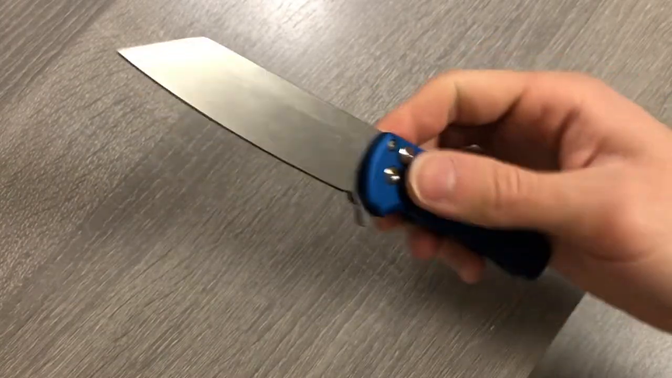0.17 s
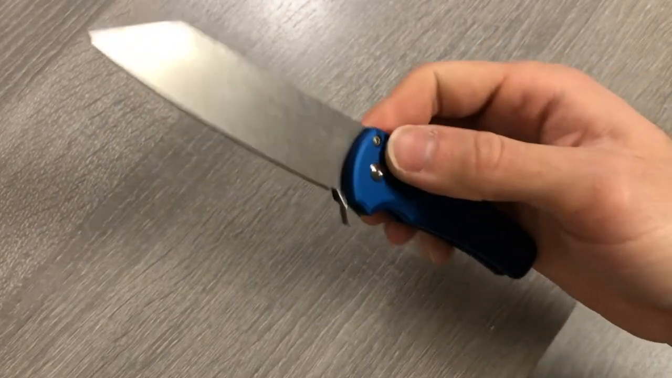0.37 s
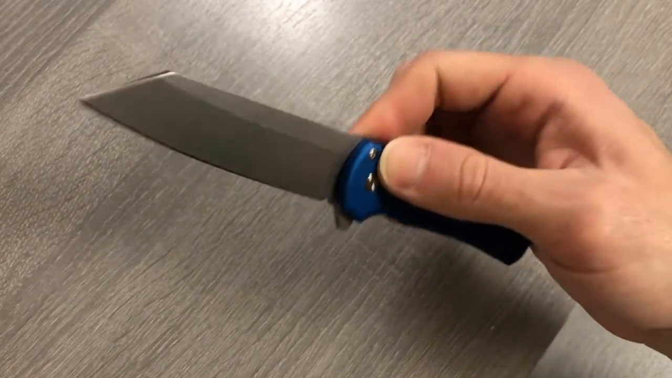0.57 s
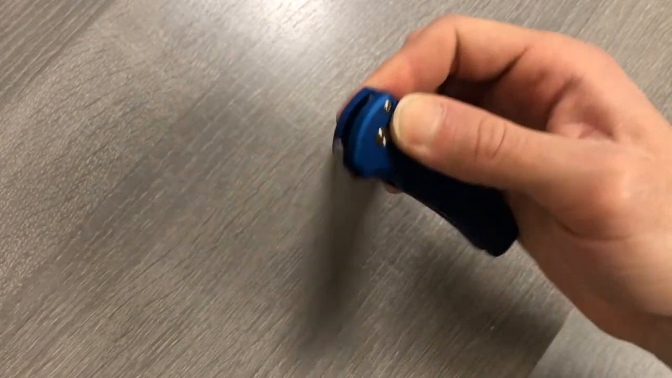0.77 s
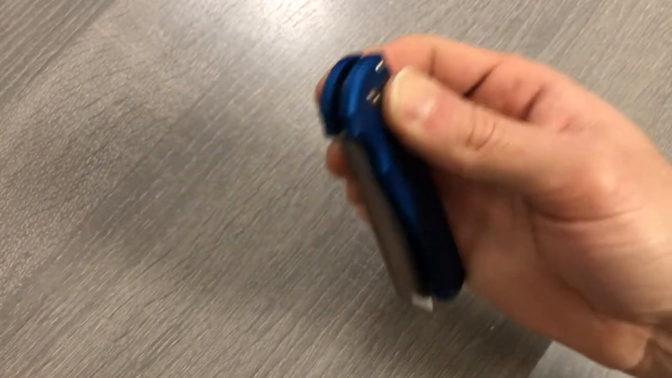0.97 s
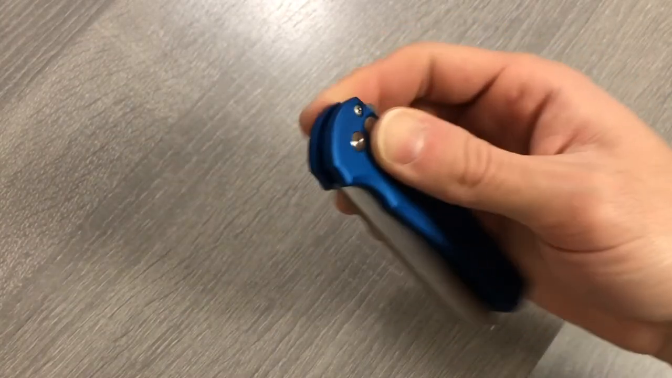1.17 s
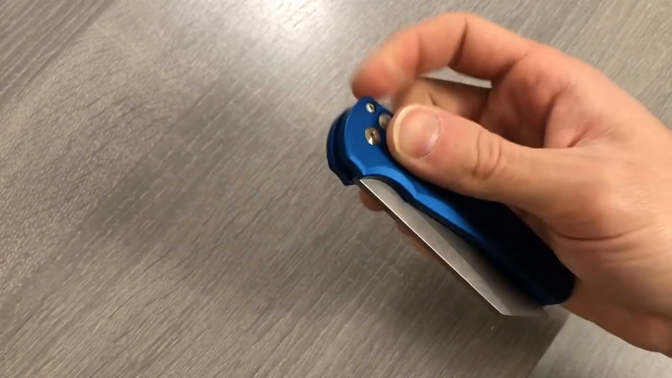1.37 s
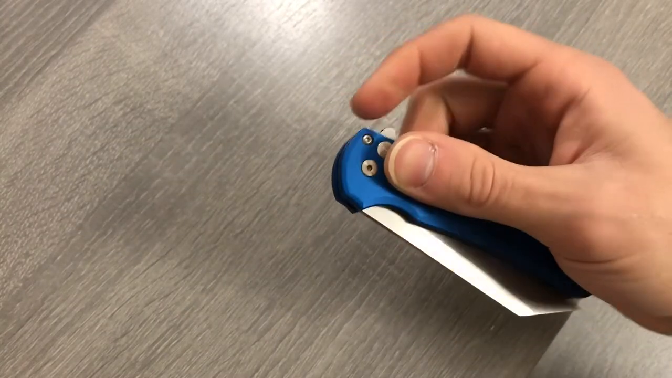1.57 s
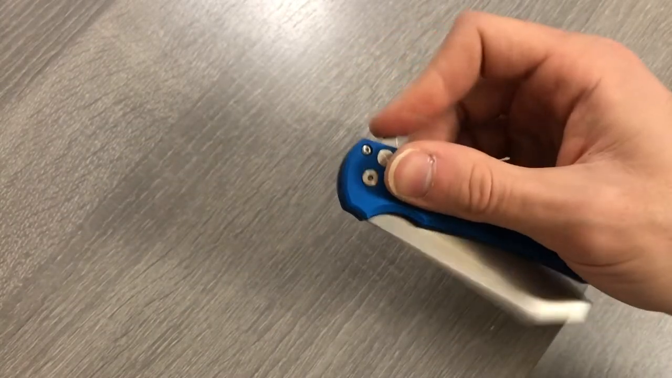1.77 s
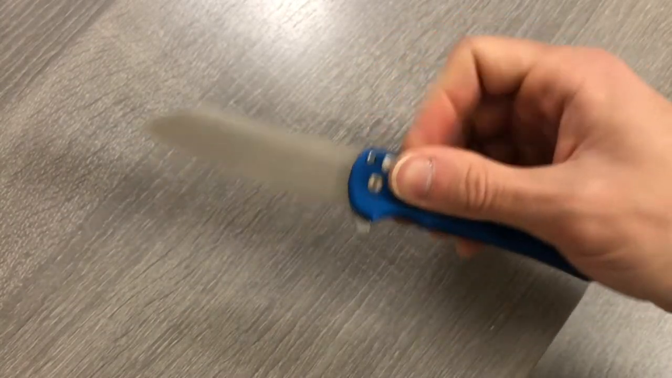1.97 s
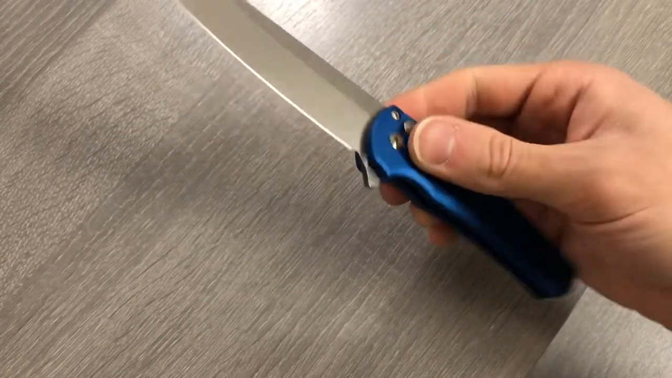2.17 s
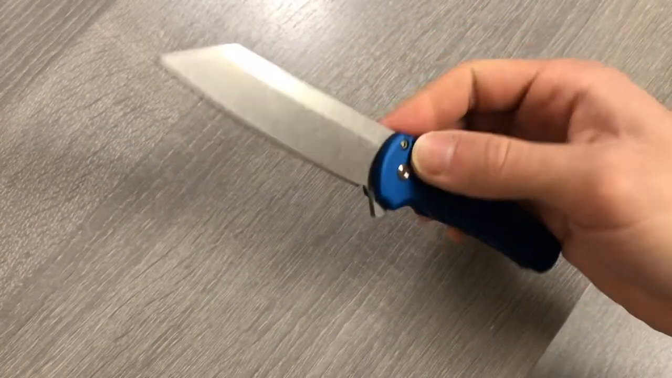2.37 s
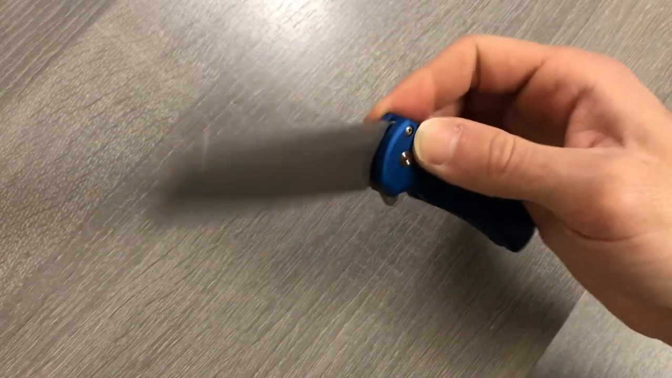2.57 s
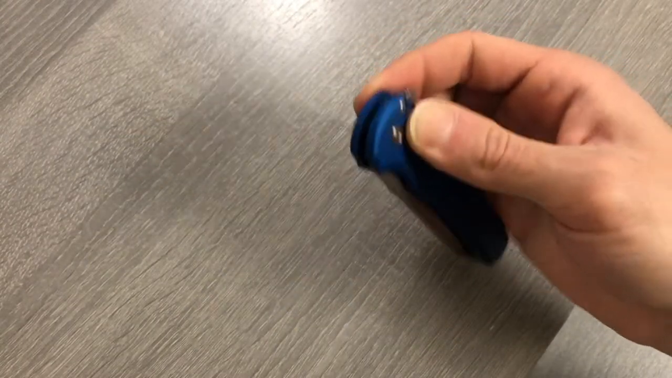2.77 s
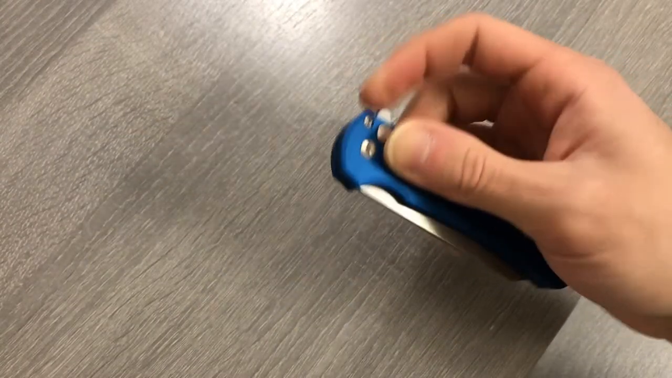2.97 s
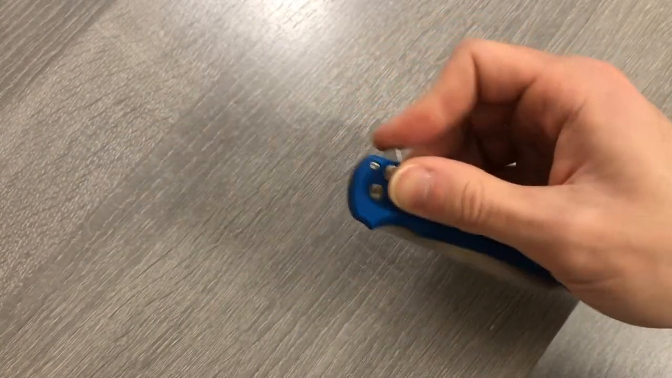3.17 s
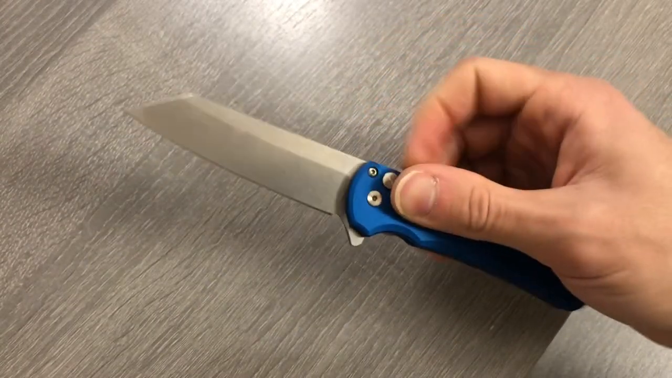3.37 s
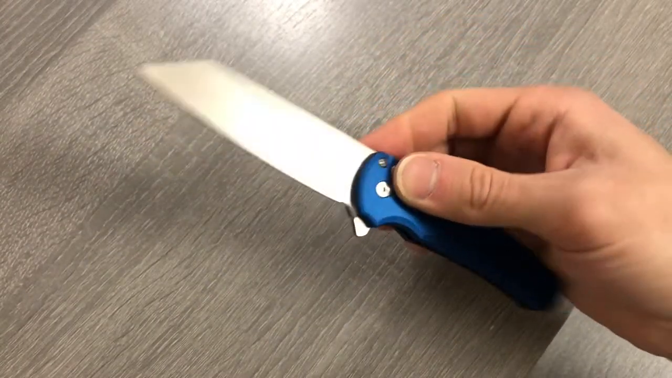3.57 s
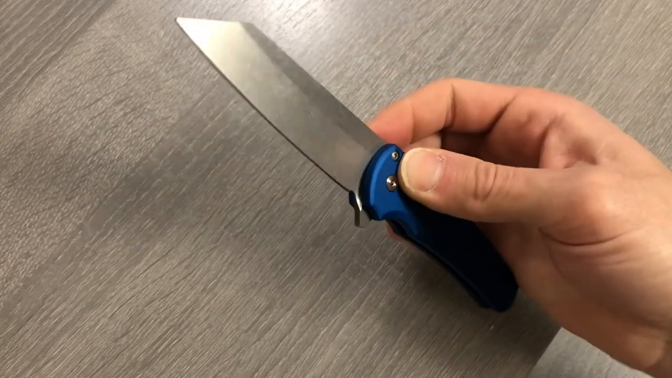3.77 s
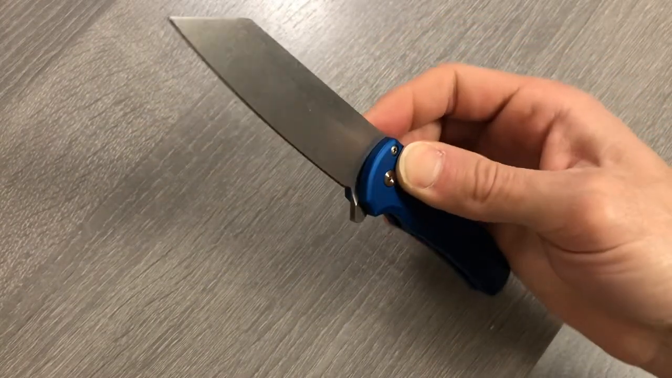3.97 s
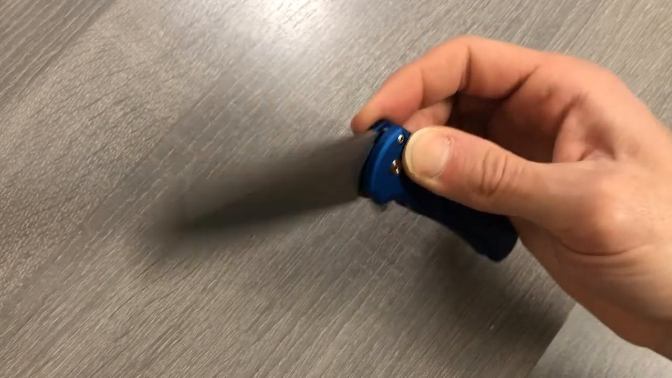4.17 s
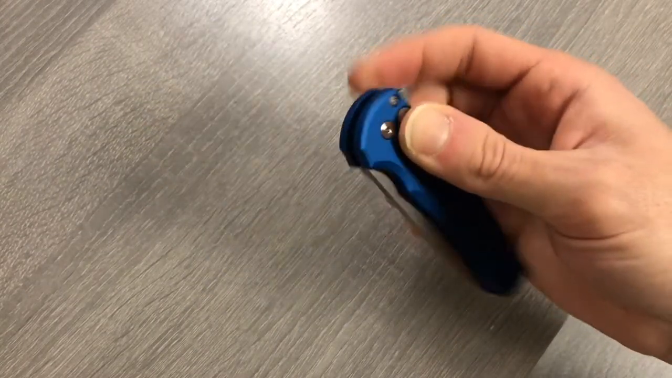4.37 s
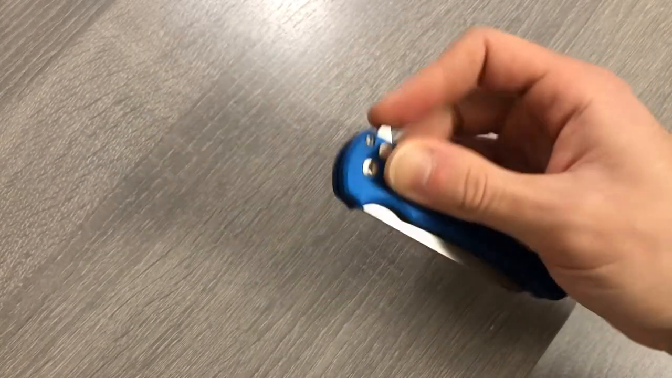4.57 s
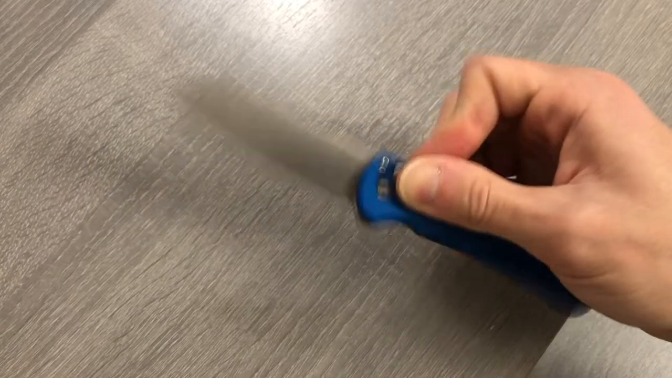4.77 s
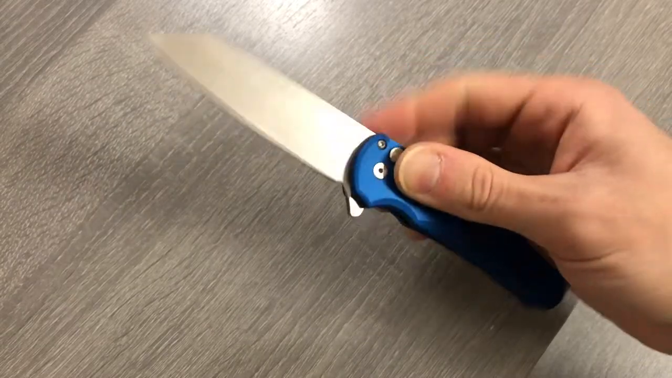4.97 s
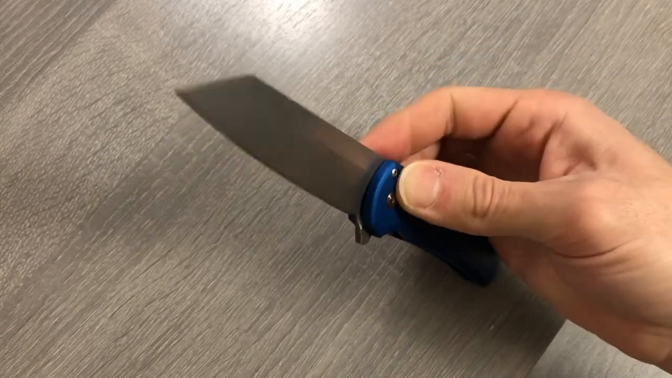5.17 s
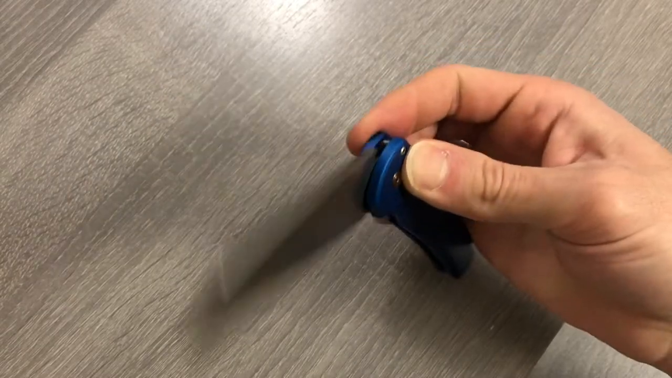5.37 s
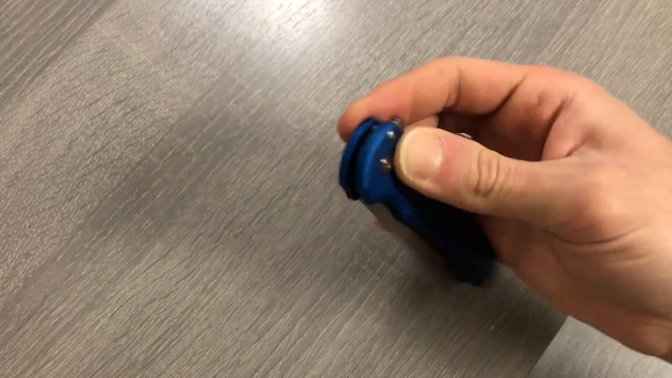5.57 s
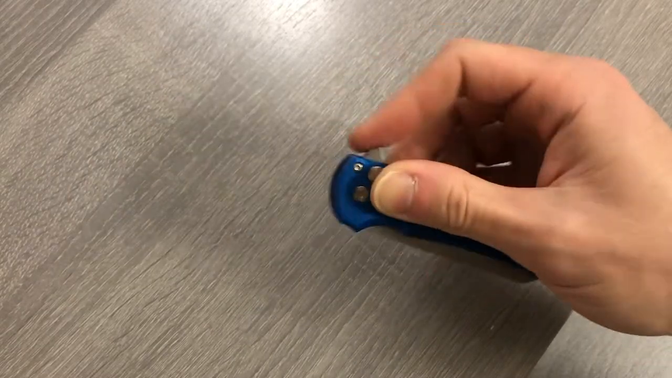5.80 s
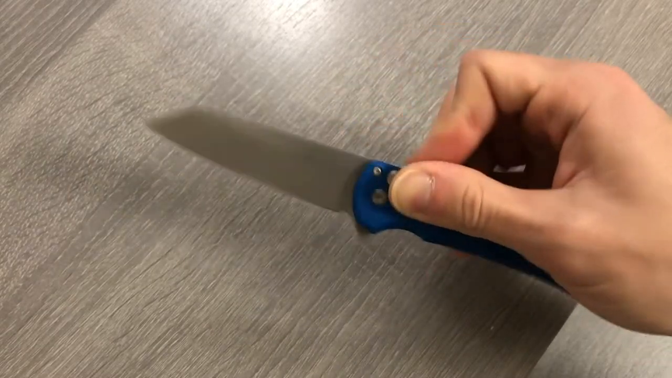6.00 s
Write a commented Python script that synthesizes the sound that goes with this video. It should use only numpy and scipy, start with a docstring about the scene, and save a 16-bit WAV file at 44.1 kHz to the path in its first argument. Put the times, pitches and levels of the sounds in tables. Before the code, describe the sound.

Sharp, loud steel clicks of a folding knife repeatedly opening and closing in the hand, with small button clicks and low ventilation rumble behind.

```python
"""Button-lock pocket knife

A knife is worked four times over a desk in a small room, close to the microphone. The thumb presses the
lock button, the blade swings shut, a finger trips the flipper and the blade snaps open against its stop.
Each blow is a noise clatter plus decaying steel modes, convolved with a synthetic room; the hardest overload
the input. Jolts are damped sines, shimmer and slides shaped noise. Ventilation rumbles and hums behind."""
import sys
import numpy as np
from scipy import signal
from scipy.fft import rfft, irfft
from scipy.io import wavfile
from scipy.ndimage import uniform_filter1d

SR = 44100
rng = np.random.default_rng(int(sys.argv[2]) if len(sys.argv) > 2 else 0)


def materialize(psi):
    """Save the field psi as 16-bit PCM at rate SR to the path in sys.argv[1].

    A 1-D psi becomes a single channel; in a 2-D psi each row is a channel.
    """
    bounded = np.clip(np.atleast_2d(psi).T, -1, 1)
    quanta = np.round(bounded * 32767).astype(np.int16)
    wavfile.write(sys.argv[1], SR, quanta)


N = 266143

# Blade slams against its stop and locks, jolting the handle. Each row: start in seconds, level in dB,
# tilt in dB per octave, knock level in dB, knock frequency in Hz.
LOCK_EVENTS = [(1.9107, -7.5, -2, -35.5, 1450), (3.265, 1, 2, -29.5, 1050), (4.7619, 0.5, .5, -31.5, 1103),
               (5.9437, 0.5, 2, -26, 980)]
# Blade drops into the handle. Each row: start in seconds, level in dB, tilt in dB per octave,
# rebound delay in seconds, rebound level in dB re the blow, knock level in dB.
SHUT_EVENTS = [(0.8243, -9.5, .5, 0.024, -25, -42), (2.7437, -9, -1, .0237, -14.5, -42),
               (4.3092, -6, .5, .012, -9, -25), (5.4988, -12, -2, .024, -23, -37),
               (5.5785, -17.5, -1, .008, -8.5, -43)]
# Flipper trips, then the detent lets the blade go. Each row: start in seconds, trip level in dB,
# release delay in seconds, release level in dB.
FLIP_EVENTS = [(1.77, -34.5, .0412, -26.5), (3.1921, -21.5, 0.021, -25.5), (4.686, -21.5, .023, -28),
               (5.8677, -24, .0222, -27)]
# Thumb presses the lock button. Each row: start in seconds, level in dB.
PRESS_EVENTS = [(0.539, -20), (2.4171, -37.5), (3.6956, -27.5), (5.1554, -37.5)]
# Faint ticks of play in pivot and button. Each row: start in seconds, level in dB, tilt in dB per octave.
TICK_EVENTS = [(.346, -57, 4), (1.146, -69, 2), (1.9059, -36, -5), (2.151, -67, -6), (2.626, -59, -5),
               (2.7415, -45, -2), (3.892, -60, -10), (4.009, -60.5, -5), (4.134, -61, -11)]
# Skin slides on the handle, blade turns on its pivot. Each row: middle in seconds, level in dB.
RUB_EVENTS = [(.04, -61), (.775, -63.5), (2.69, -70), (3.578, -60.5), (4.26, -65.5), (5.04, -67),
              (5.485, -62)]
# Thumb squeaks as it shifts onto the button. Each row: middle in seconds, level in dB.
SQUEAK_EVENTS = [(.115, -66), (.185, -68), (.34, -72)]

# Knife modes: clear steel ones first, then those damped by the hand. Each row: frequency in Hz, t60 in seconds
# before grip damping, relative spectral peak in dB for press, shut, flip and lock.
KNIFE_MODES = [(1830, .045, -35, -40, -22, -7), (3956, .07, -22, -15, -4, -12),
               (4570, .05, -30, -25, -6, -3), (4748, .05, -10, -15, 1, -12), (6826, .12, 0, -4, -2, -5),
               (7380, .03, -8, 0, 0, 5), (8230, .25, 3, 10, 7, 3), (9220, .1, 3, -8, -3, 8),
               (9305, .1, -12, 3, 10, 8), (11030, .04, 13, 1, -2, -3), (11315, .05, 2, -6, -3, 10),
               (12160, .025, 0, -2, 2, 5), (2730, .022, -13, -28, -16, -5),
               (3160, .008, -11, -11, -11, -16), (3680, .025, -30, -30, -22, -9),
               (4914, .012, -18, -12, -10, -7), (5350, .014, -5, -2, -5, -9), (5862, .016, -4, -6, -20, -7),
               (6555, .016, -14, 3, 6, -5), (7165, .02, -6, 5, 0, 0), (7920, .014, 5, 8, 9, 3),
               (8260, .02, 4, 7, 1, 8), (8480, .025, -5, 5, -12, 4), (9720, .02, -1, -4, 2, 2),
               (10440, .03, -20, -6, -14, 2), (11870, .016, -4, -6, 4, -3), (12661, .018, -4, -6, 0, 0),
               (13200, .016, -2, 0, -5, -6), (14730, .02, 7, -5, -1, -4)]

# Clatter spectrum of each kind of blow. Each row: frequency in Hz, relative density in dB per Hz.
LOCK_SPECTRUM = [(300, -38.5), (1000, -24), (2000, -25), (2800, -16.5), (3600, -21), (5000, -13.5),
                 (6500, -4.5), (8200, 2.5), (10500, -4.5), (12500, 0.5), (14000, -11), (15500, -19.5)]
SHUT_SPECTRUM = [(300, -42.5), (1000, -41.5), (2300, -40), (3100, -26), (4000, -26), (5500, -12.5),
                 (6800, -0.5), (7900, 6), (9000, 0.5), (11000, -4.5), (13200, -3.5), (15500, -22.5)]
FLIP_SPECTRUM = [(300, -33), (1500, -30), (3000, -11), (3800, -12.5), (5000, -6), (7800, 3.5),
                 (10000, -2.5), (12500, 6), (13800, -10.5), (15000, -2), (16000, -5)]
PRESS_SPECTRUM = [(300, -27), (1500, -17), (3000, -25), (4300, -15), (6000, -12), (8200, 7), (9000, -3),
                  (10500, 2.5), (11500, 0.5), (14500, 9.5), (16000, -4)]
# Spectra of shut-blade shimmer, sliding hiss, ventilation air and duct rumble.
# Each row: frequency in Hz, relative density in dB per Hz.
SHIMMER_SPECTRUM = [(3000, -39.5), (3950, -16.5), (4600, -26), (6600, -9.5), (7700, 0), (8300, -3.5),
                    (9000, -16.5), (12000, -26), (15000, -39.5)]
HISS_SPECTRUM = [(1500, -20.5), (4500, -8.5), (6000, -8.0), (8200, -2.0), (12000, -1.5), (15500, -5)]
AIR_SPECTRUM = [(94, -37.5), (160, -14), (273, -1.5), (534, -21.5), (672, -18), (740, -20), (830, -20.5),
                (1040, -27.5), (1130, -25), (4300, -43), (5210, -45), (8090, -42), (15500, -50.5)]
RUMBLE_SPECTRUM = [(10, -2), (22, -7), (29, 4.5), (36, -11), (48, -12.5), (64, -13), (80, -28.5),
                   (110, -28), (170, -33.5), (230, -50.5)]

# Room decay. Each row: frequency in Hz, t60 in seconds.
ROOM_DECAY = [(300, 0.46), (2000, 0.31), (4500, 0.3148), (8000, 0.1767), (11000, 0.2057), (15000, 0.18)]
# Spectrum of the room's tail. Each row: frequency in Hz, relative level in dB.
ROOM_SPECTRUM = [(300, -2), (1000, -1), (1850, 3.5), (3100, -0.5), (4500, 2.5), (8000, -2), (11000, 0),
                 (15000, -3.5)]
# Single echoes. Each row: nominal delay in seconds, level in dB re the direct sound.
ROOM_ECHOES = [(.0021, -23.5), (0.0114, -20.5), (0.0144, -22.5), (.0203, -24.5), (0.0271, -23.5)]

# per dB of slam level
LOCK_CLATTER_S_PER_DB, LOCK_RING_DB_PER_DB = 0.03, 0.7
# second, duller contact after landing; level re the landing, tilt per octave
SEAT_DELAY_S, SEAT_DB, SEAT_TILT_DB = .003, -8.5, -5.5
# detent ball catches on the blade; delay and level re the trip
CATCH_DELAY_S, CATCH_DB = .0132, -18
# per dB of press level above the firm one
FIRM_PRESS_DB, PRESS_TILT_DB_PER_DB, PRESS_RING_DB_PER_DB = -20, 0.29, -0.4
# thud level re the knock
KNOCK_LAG_S, SHUT_KNOCK_HZ, THUD_HZ, THUD_DB = .003, 3090, 280, -13.5
# shimmer level re the blow
SHIMMER_DB, SHIMMER_T60_S = -30, 0.29
# singing level re the hiss
RUB_S, SING_HZ, SING_DB = .1, 8250, -10
SQUEAK_S, SQUEAK_HZ = .06, 5900
AIR_DB, RUMBLE_DB, HUM_HZ, HUM_DB = -55, -36.0, 120, -50.5
BAND_EDGE_HZ = 15700


def gain_of(db):
    """Decibels to an amplitude factor."""
    return 10 ** (np.asarray(db) / 20)


def evened(x):
    """Scales to rms 1."""
    return x / np.sqrt(np.mean(x ** 2) + 1e-20)


def as_blow(x):
    """Scales to the energy of 4 ms at rms 1."""
    return x * np.sqrt(.004 * SR / np.sum(x ** 2))


def read(points, hz):
    """Interpolates a spectrum on a log-frequency axis."""
    point_hz, value = np.transpose(points)
    return np.interp(np.log(hz + 1), np.log(point_hz + 1), value)


def add(mix, start_s, sound):
    """Mixes a sound in at start_s, or at 0 if that is negative."""
    part = mix[max(round(start_s * SR), 0):][:len(sound)]
    part += sound[:len(part)]


def noise(spectrum_db):
    """Steady noise of a given spectrum, rms 1."""
    gain = gain_of(read(spectrum_db, np.fft.rfftfreq(N, 1 / SR)))
    return evened(irfft(rfft(rng.standard_normal(N)) * gain, N))


def tint(x, spectrum_db, tilt_db):
    """Minimum-phase filter: sets a burst's broad spectrum, tilted about 8 kHz, and leaves its fine ripple."""
    hz = abs(np.fft.fftfreq(len(x), 1 / SR))
    spectrum = np.fft.fft(x)
    broad = np.sqrt(uniform_filter1d(abs(spectrum) ** 2, size=140, mode="wrap"))
    target_db = read(spectrum_db, hz) + tilt_db * np.log2(np.maximum(hz, 1000) / 8000)
    log_gain = np.log(gain_of(target_db) / broad)
    minimum_phase = np.exp(np.conj(signal.hilbert(log_gain)))
    return np.fft.ifft(spectrum * minimum_phase).real


def blows(contacts, spectrum_db, room_db, rise_s, grip_t60_s, peak_column):
    """Steel meets metal: a clatter of tiny contacts, the ring of the knife's modes, the room's answer."""
    t = np.arange(8192) / SR
    hz, t60_s, *peaks_db = np.transpose(KNIFE_MODES)[:, :, None]
    attack = 1 - np.exp(-t / rise_s)
    # for the same spectral peak, a short mode swings wider
    fading = gain_of(peaks_db[peak_column] - 60 * t / t60_s) / t60_s * attack
    fading = fading * gain_of(-60 * t / grip_t60_s)  # grip damps every mode further
    out = np.zeros(N)
    for start_s, level_db, clatter_t60_s, tilt_db, ring_db in contacts:
        # grip shifts from blow to blow and detunes the modes a little
        detune, phase = rng.standard_normal((2, len(hz), 1))
        swinging = np.sin(2 * np.pi * (hz * (1 + .0015 * detune) * t + phase))
        ring = (fading * swinging).sum(0)
        impulses = rng.choice([-1., 1.], len(t)) * attack * gain_of(-60 * t / clatter_t60_s)
        clatter = tint(impulses, spectrum_db, tilt_db)
        click = as_blow(as_blow(clatter) + gain_of(ring_db) * as_blow(ring))
        add(out, start_s, signal.fftconvolve(gain_of(level_db) * click, room(room_db)))
    return out


def lock_blows(clatter_t60_s=0.02, ring_db=-3.0):
    """One hard contact per opening; a harder slam clatters longer and rings more."""
    contacts = []
    for start_s, db, tilt_db, *_ in LOCK_EVENTS:
        t60_s = max(clatter_t60_s + LOCK_CLATTER_S_PER_DB * db, .005)
        contacts.append((start_s, db, t60_s, tilt_db, ring_db + LOCK_RING_DB_PER_DB * db))
    return blows(contacts, LOCK_SPECTRUM, room_db=-14, rise_s=.0003, grip_t60_s=0.43, peak_column=3)


def shut_blows(land_t60_s=.022, seat_t60_s=.018, rebound_t60_s=0.026,
               land_ring_db=-5, ring_db=-3, rebound_tilt_db=-3):
    """The blade lands, seats with a duller contact and rebounds once."""
    contacts = []
    for start_s, db, tilt_db, rebound_s, rebound_db, _ in SHUT_EVENTS:
        contacts += [
            (start_s, db, land_t60_s, tilt_db, land_ring_db),
            (start_s + SEAT_DELAY_S, db + SEAT_DB, seat_t60_s, tilt_db + SEAT_TILT_DB, ring_db),
            (start_s + rebound_s, db + rebound_db, rebound_t60_s, tilt_db + rebound_tilt_db, ring_db)]
    return blows(contacts, SHUT_SPECTRUM, room_db=-14.0, rise_s=0.00024, grip_t60_s=.14, peak_column=1)


def flip_blows(trip_t60_s=.014, trip_tilt_db=-0.5, trip_ring_db=-3,
               catch_t60_s=.02, catch_tilt_db=-3, catch_ring_db=4,
               release_t60_s=.027, release_tilt_db=-.3, release_ring_db=5):
    """A dry trip click, a faint catch of the detent ball, then the ringing release."""
    contacts = detent_contact()
    for start_s, db, release_s, release_db in FLIP_EVENTS:
        contacts += [
            (start_s, db, trip_t60_s, trip_tilt_db, trip_ring_db),
            (start_s + CATCH_DELAY_S, db + CATCH_DB, catch_t60_s, catch_tilt_db, catch_ring_db),
            (start_s + release_s, release_db, release_t60_s, release_tilt_db, release_ring_db)]
    return blows(contacts, FLIP_SPECTRUM, room_db=-11, rise_s=.0005, grip_t60_s=.6, peak_column=2)


def detent_contact(start_s=4.2712, level_db=-28.5, clatter_t60_s=.022, tilt_db=2.5, ring_db=-8):
    """Once the closing blade clicks over the detent on its way in."""
    return [(start_s, level_db, clatter_t60_s, tilt_db, ring_db)]


def press_blows(clatter_t60_s=0.028, ring_db=-1, snap_db=-3, snap_t60_s=0.0069, snap_ring_db=-14):
    """The button bottoms out: sharp snap plus short clatter; a gentler press is duller and rings more."""
    contacts = []
    for start_s, db in PRESS_EVENTS:
        firm_db = db - FIRM_PRESS_DB
        tilt_db = PRESS_TILT_DB_PER_DB * firm_db
        contacts += [(start_s, db + snap_db, snap_t60_s, tilt_db, snap_ring_db),
                     (start_s, db, clatter_t60_s, tilt_db, ring_db + PRESS_RING_DB_PER_DB * firm_db)]
    return blows(contacts, PRESS_SPECTRUM, room_db=-15.5, rise_s=0.00018, grip_t60_s=.5, peak_column=0)


def tick_blows(clatter_t60_s=.022, ring_db=0):
    """Play in pivot and button makes light contacts with the flipper's spectrum and modes."""
    contacts = [(start_s, db, clatter_t60_s, tilt_db, ring_db) for start_s, db, tilt_db in TICK_EVENTS]
    return blows(contacts, FLIP_SPECTRUM, room_db=-23.0, rise_s=.0003, grip_t60_s=.6, peak_column=2)


def swing(hz, decay_s):
    """The handle, damped by the hand, swings for only a few cycles."""
    t = np.arange(2048) / SR
    return as_blow(np.sin(2 * np.pi * hz * t) * t * np.exp(-t / decay_s))


def knocks():
    """Each opening and closing jolts the handle just after the blow; on opening, a soft hand thud lies below."""
    jolts = []
    for start_s, _, _, db, hz in LOCK_EVENTS:
        thud = gain_of(THUD_DB) * swing(THUD_HZ, decay_s=0.0012)
        jolts.append((start_s, db, swing(hz, decay_s=.001) + thud))
    for start_s, *_, db in SHUT_EVENTS:
        jolts.append((start_s, db, swing(SHUT_KNOCK_HZ, decay_s=0.001)))
    out = np.zeros(N)
    for start_s, db, jolt in jolts:
        add(out, start_s + KNOCK_LAG_S, signal.fftconvolve(gain_of(db) * jolt, room(room_db=-27)))
    return out


def shimmer():
    """The shut blade's many close modes, as a decaying wash of shaped noise that follows the blow's level."""
    t = np.arange(SR // 3) / SR
    wash = noise(SHIMMER_SPECTRUM)
    out = np.zeros(N)
    for start_s, level_db, *_ in SHUT_EVENTS:
        fading = gain_of(level_db + SHIMMER_DB - 60 * t / SHIMMER_T60_S)
        add(out, start_s, fading * wash[round(start_s * SR):][:len(t)])
    return out


def rubs():
    """Grainy hiss swells and fades with each slide, blade singing faintly; a squeak is hiss in a resonance."""
    hiss = noise(HISS_SPECTRUM)
    grain = evened(uniform_filter1d(rng.standard_normal(N), size=90))
    hiss *= evened(gain_of(3 * grain))
    squeak = evened(signal.lfilter(*signal.iirpeak(SQUEAK_HZ, 22, fs=SR), hiss))
    singing = evened(signal.lfilter(*signal.iirpeak(SING_HZ, 90, fs=SR), hiss))
    hiss += gain_of(SING_DB) * singing
    out = np.zeros(N)
    for events, length_s, sound in (RUB_EVENTS, RUB_S, hiss), (SQUEAK_EVENTS, SQUEAK_S, squeak):
        stroke = np.hanning(round(length_s * SR))
        for middle_s, level_db in events:
            piece = sound[round(middle_s * SR):][:len(stroke)]
            add(out, middle_s - length_s / 2, gain_of(level_db) * stroke * piece)
    return out


def room(room_db):
    """Direct sound, first echoes and a diffuse tail, longest in the bass; new for each place of the hand."""
    taps = np.zeros(SR // 3)
    at = np.arange(0, len(taps) - 10, 10)
    taps[at + rng.integers(0, 10, len(at))] = rng.choice([-1., 1.], len(at))
    hz, t, bins = signal.stft(taps, SR, nperseg=256)
    decay_db = -60 * t / read(ROOM_DECAY, hz)[:, None]
    bins = bins * gain_of(read(ROOM_SPECTRUM, hz)[:, None] + decay_db)
    tail = signal.istft(bins, SR, nperseg=256)[1]
    tail *= 1 - np.exp(-(np.arange(len(tail)) / SR / 0.0048) ** 2)  # walls take a moment to answer
    response = gain_of(room_db) * tail / np.linalg.norm(tail)
    response[0] += 1  # direct sound
    for delay_s, db in ROOM_ECHOES:
        add(response, delay_s * (1 + .04 * rng.standard_normal()), gain_of([db]))
    return response


def background():
    """Ventilation: shaped-noise duct rumble and air rush, with a mains hum of slightly wavering phase."""
    waver = evened(signal.resample(rng.standard_normal(30), N))
    hum = np.sqrt(2) * np.sin(2 * np.pi * HUM_HZ * np.arange(N) / SR + 0.065 * waver)
    low_pass = signal.butter(4, 250, fs=SR, output="sos")
    rumble = signal.sosfilt(low_pass, noise(RUMBLE_SPECTRUM))
    return gain_of(AIR_DB) * noise(AIR_SPECTRUM) + gain_of(RUMBLE_DB) * rumble + gain_of(HUM_DB) * hum


def scene():
    """Knife blows and small handling sounds over the background."""
    knife = lock_blows() + shut_blows() + flip_blows() + press_blows() + tick_blows()
    handling = knocks() + shimmer() + rubs()
    return (knife + handling + background())[None]


def record(dry):
    """The hardest snaps overload the input and are flattened; then the band limit."""
    ceiling = 0.85
    clipped = dry / (1 + (dry / ceiling) ** 8) ** (1 / 8)
    low_pass = signal.firwin(255, BAND_EDGE_HZ, window=("kaiser", 8), fs=SR)
    return signal.oaconvolve(clipped, low_pass[None], "same")


dry = scene()
out = record(dry)
materialize(out)
```